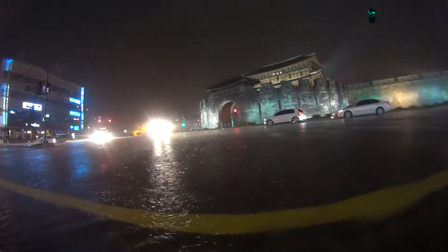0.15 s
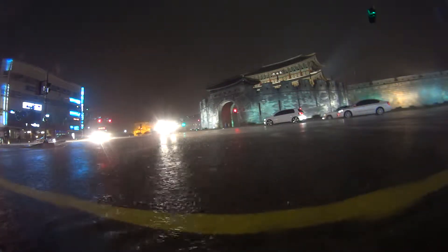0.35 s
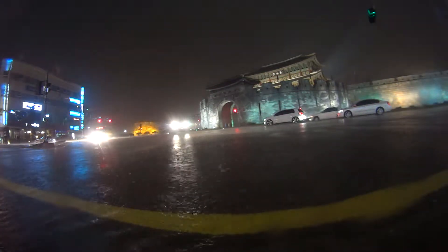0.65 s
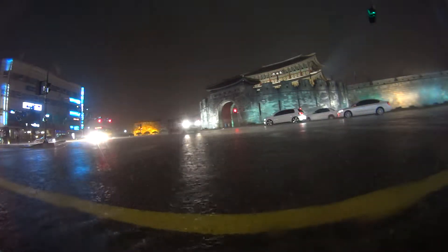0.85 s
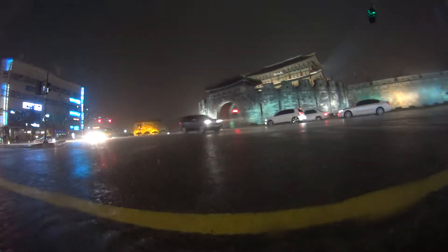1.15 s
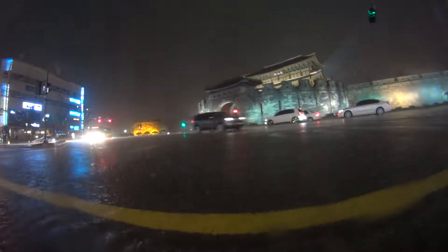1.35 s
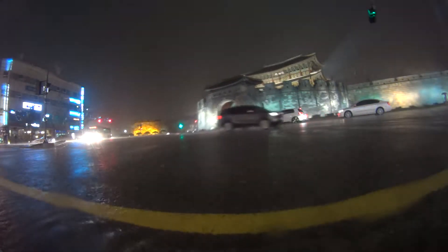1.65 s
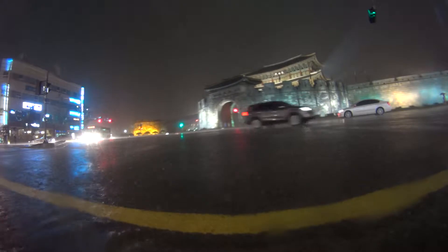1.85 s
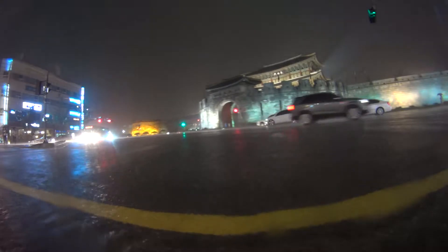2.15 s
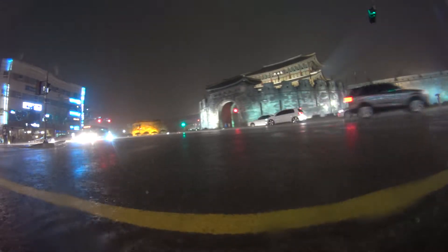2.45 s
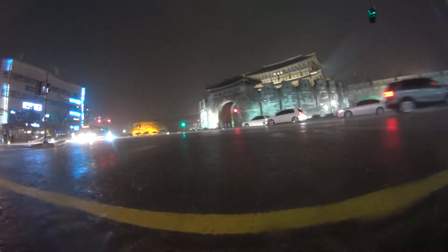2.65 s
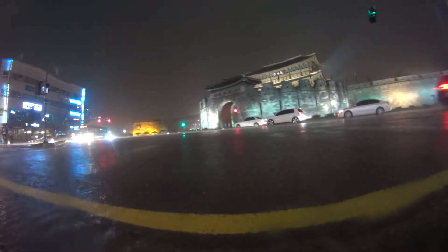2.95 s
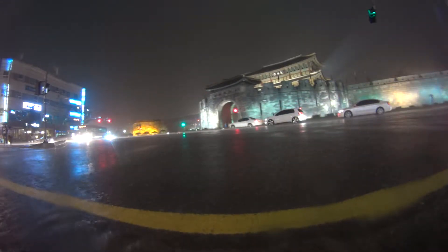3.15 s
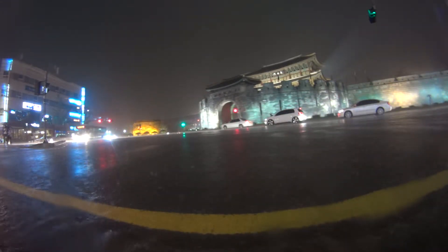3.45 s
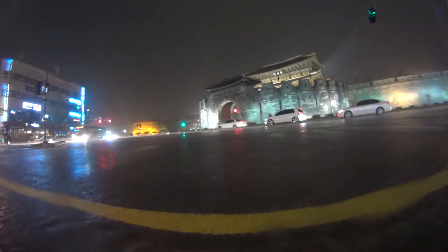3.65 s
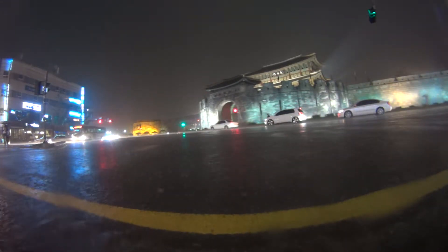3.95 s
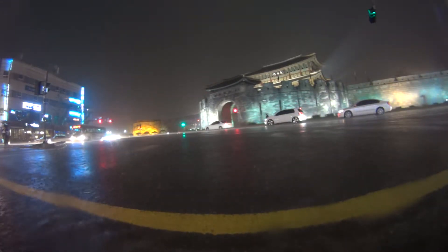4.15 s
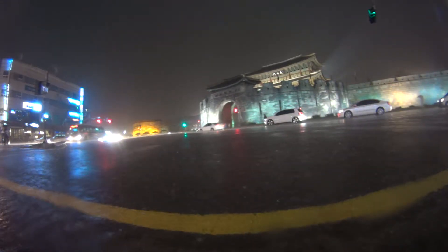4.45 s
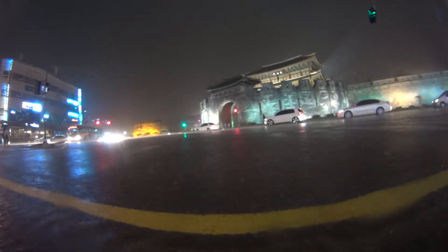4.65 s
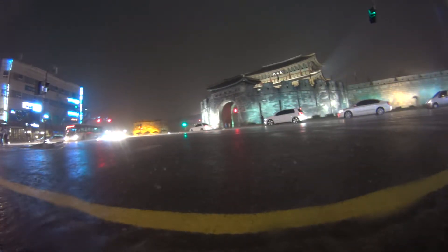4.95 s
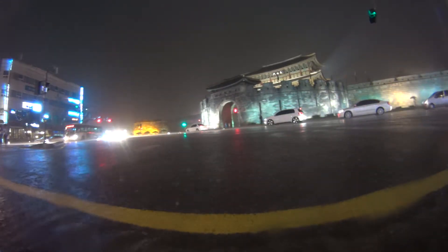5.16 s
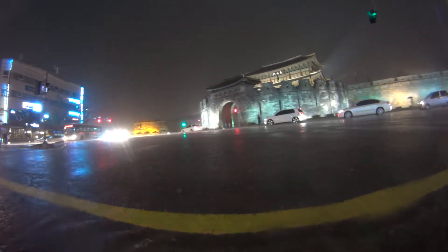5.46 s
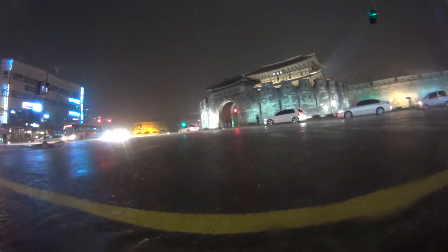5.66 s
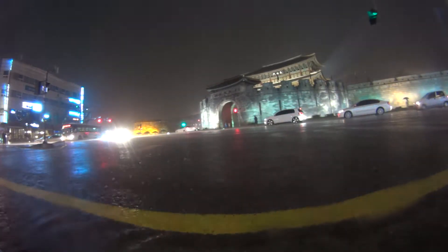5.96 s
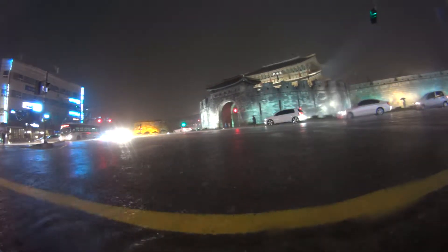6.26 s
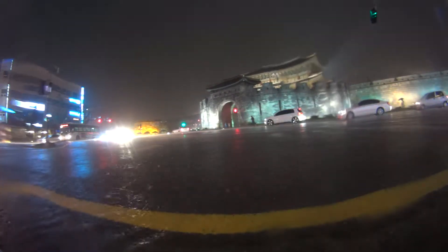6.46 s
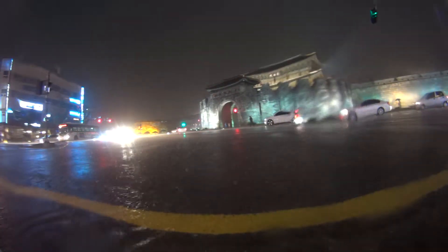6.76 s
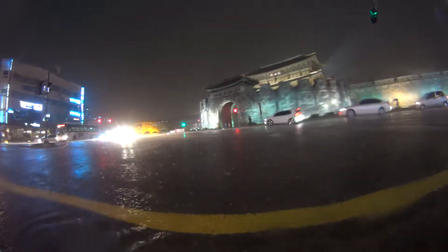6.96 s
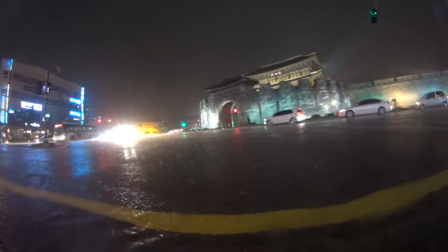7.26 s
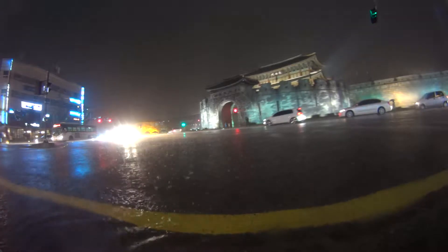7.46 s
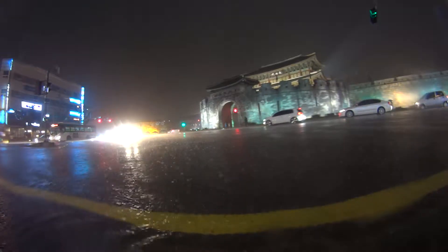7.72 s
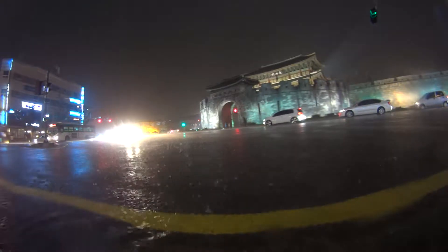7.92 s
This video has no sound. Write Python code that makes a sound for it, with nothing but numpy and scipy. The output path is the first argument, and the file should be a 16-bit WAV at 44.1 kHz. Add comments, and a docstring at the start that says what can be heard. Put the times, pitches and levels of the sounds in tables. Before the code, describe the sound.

Heavy rain drums hard on a small plastic camera housing at ground level, ringing and cracking, while a car swishes past on the wet road.

```python
"""Heavy night rain on a wet road, heard from a small waterproof camera standing on the ground.
From the start rain patters on the asphalt all round and drops crack, ring and thud on the housing;
a few land softly and gulp. A car swishes past through the water, closest just before two seconds.
From the middle a few drops trap a bubble and ping; distant traffic swells again at the end.
Shaped noise makes road and tyres, struck modes make the drops; a limiter ducks after the loudest."""
import sys
import numpy as np
from scipy import signal
from scipy.fft import rfft, irfft, next_fast_len
from scipy.io import wavfile
from scipy.ndimage import uniform_filter1d

SR = 44100
rng = np.random.default_rng(int(sys.argv[2]) if len(sys.argv) > 2 else 0)


def file_out(sig):
    """Save sig as 16-bit WAV at sys.argv[1]."""
    # one column per channel
    cols = np.atleast_2d(sig).T
    # limit, then scale
    lim = np.clip(cols, -1, 1)
    pcm = np.round(lim * 32767).astype(np.int16)
    wavfile.write(sys.argv[1], SR, pcm)


N = 356769  # length in samples


def from_db(db):
    """Decibels to gain."""
    return 10 ** (np.asarray(db) / 20)


def rms_one(x):
    """Scale to rms 1."""
    return x / np.sqrt(np.mean(x ** 2) + 1e-20)


def in_time(rows):
    """One curve per column after the time in seconds, a value at every sample."""
    s, *columns = np.transpose(rows)
    return [np.interp(np.arange(N) / SR, s, c) for c in columns]


def colour(x, points, share=1):
    """Causal (minimum-phase) filter with the given spectrum, or a share of its decibels."""
    size = next_fast_len(N + 8192)
    size += size % 2
    hz, db = np.transpose(points)
    bins_hz = np.arange(size // 2 + 1) * SR / size
    curve_db = share * np.interp(np.log(bins_hz + 1), np.log(hz), db)
    # folding the cepstrum onto positive times makes the filter causal
    cepstrum = irfft(np.log(from_db(curve_db)))
    cepstrum[1:size // 2] *= 2
    cepstrum[size // 2 + 1:] = 0
    response = np.exp(rfft(cepstrum))
    return irfft(rfft(x, size) * response)[..., :N]


def filtered(x, order, hz, kind="low"):
    """Butterworth filter along time."""
    return signal.sosfilt(signal.butter(order, hz, kind, fs=SR, output="sos"), x)


def wander(size):
    """Slow chance, smooth over size samples; spread 1."""
    return rms_one(uniform_filter1d(rng.standard_normal(N), size=size, mode="wrap"))


# How outside sound reaches the two microphone ports in step. Each row: frequency in Hz, gain in dB.
IN_STEP_SPECTRUM = [(30, -14.5), (60, -5), (230, -9), (310, -4.5), (450, -8), (1170, -2), (1540, 13),
                    (2000, -0.5), (2650, -6.5), (3250, 1.5), (3600, -11), (5000, -7.5), (6400, -16.5),
                    (7400, -21), (8200, -18.5), (10300, -39.5)]
# The same for sound that reaches the ports opposed. Each row: frequency in Hz, gain in dB.
OPPOSED_SPECTRUM = [(170, -22), (310, -4), (420, -11), (1250, -6), (1540, 1), (2150, -12.5), (2900, 5),
                    (3650, -9), (4300, -4.5), (5100, -17), (7200, -17.5), (10300, -37)]
# Colour that sets the ports apart, applied in part to each. Each row: frequency in Hz, full tilt in dB.
PORT_TILT = [(500, 0.5), (980, -2.5), (1450, 3), (2300, 11.5), (3100, 0.5), (4200, -1), (5500, 1.5)]


def through_ports(pair):
    """Two unrelated signals become a diffuse sound heard through the housing; rms 1."""
    mid = colour(pair[0], IN_STEP_SPECTRUM)
    side = colour(pair[1], OPPOSED_SPECTRUM)
    left = colour(mid + side, PORT_TILT, 0.42)
    right = colour(mid - side, PORT_TILT, -0.11)
    return rms_one(np.array([left, right]))


# Rain on the asphalt as it reaches the ports. Each row: time in seconds, rms level in dB.
RAIN_LEVEL = [(0, -29.5), (3.2, -31), (5.1, -33), (6.8, -31.5), (8.09, -31)]


def road_rain(ticks_per_s=700, spread_db=14.0, wash_db=2, tick_top_hz=3500):
    """Near drops tick on the asphalt, softened by its water film; the countless far ones merge into a wash."""
    sizes = from_db(spread_db * np.minimum(rng.exponential(1, N), 2))
    landings = rng.random(N) < ticks_per_s / SR
    bearing = rng.uniform(0, 2 * np.pi, N)
    ticks = np.array([np.cos(bearing), np.sin(bearing)]) * sizes * landings
    ticks = filtered(ticks + 1e-18, 1, tick_top_hz)
    wash = from_db(wash_db) * rng.standard_normal((2, N))
    patter = .5 * rms_one(ticks) + wash
    return from_db(in_time(RAIN_LEVEL)[0]) * through_ports(patter)


# When the car is closest, the time it takes to cover that distance,
# and the delay before its exhaust faces the camera, all in seconds
CLOSEST_S, PASS_S, EXHAUST_LAG_S = 1.85, 1.18, 0.35
# gains when closest, the swish before the standing water is added
SWISH_DB, SPRAY_DB, ENGINE_DB = -29, -36, -52
# fall of level with distance, as powers of it: spray and engine are heard mostly side-on
SWISH_FALL, SPRAY_FALL, ENGINE_FALL = 1.0, 3.2, 7.9
FAR_RUMBLE_DB = -64.5  # gain of the steady rumble of distant engines
# Standing water under the tyres. Each row: time in seconds, swish it adds in dB.
STANDING_WATER = [(0, 1), (.8, 0.2), (1.35, 3), (1.9, -0.5), (2.45, 0.9), (2.75, 2.5), (3.5, 3.5),
                  (4.2, -10)]
# Distant traffic, drawing nearer at the end. Each row: time in seconds, swish gain in dB, spray gain in dB.
FAR_TRAFFIC = [(0, -60, -44), (4.5, -75, -51.5), (8.09, -40, -48.5)]


def passing():
    """Gains of swish, spray and engine as the car drives by in a straight line, over distant traffic."""
    t = np.arange(N) / SR - CLOSEST_S
    distance = np.hypot(1, t / PASS_S)  # 1 when closest
    exhaust_distance = np.hypot(1, (t - EXHAUST_LAG_S) / PASS_S)
    far_swish_db, far_spray_db = in_time(FAR_TRAFFIC)
    near_swish = from_db(SWISH_DB + in_time(STANDING_WATER)[0]) / distance ** SWISH_FALL
    near_spray = from_db(SPRAY_DB) / distance ** SPRAY_FALL
    near_engine = from_db(ENGINE_DB) / exhaust_distance ** ENGINE_FALL
    # near and far add as powers
    swish = np.hypot(near_swish, from_db(far_swish_db))
    spray = np.hypot(near_spray, from_db(far_spray_db))
    engine = np.hypot(near_engine, from_db(FAR_RUMBLE_DB))
    return swish, spray, engine


# Colour of the tyres' swish before the ports. Each row: frequency in Hz, gain in dB.
SWISH_COLOUR = [(200, -10.5), (1500, 0.5), (2700, 4), (5500, 6), (10000, -0.5)]
# Colour of the fine spray before the ports. Each row: frequency in Hz, gain in dB.
SPRAY_COLOUR = [(1500, -16), (4400, -21), (5000, 18), (5600, -18), (6700, -2), (7400, 20), (8200, 4),
                (9800, 24)]
# Colour of the engine's rumble. Each row: frequency in Hz, gain in dB.
RUMBLE_COLOUR = [(30, -2), (60, -38), (100, -4), (200, 4)]


def car(hum_hz=59, hum_db=-1):
    """Tyres squeeze out water, fine spray hisses while the car is side-on, the engine hums and rumbles below."""
    swish_gain, spray_gain, engine_gain = passing()
    swish = swish_gain * through_ports(colour(rng.standard_normal((2, N)), SWISH_COLOUR))
    spray = spray_gain * through_ports(colour(rng.standard_normal((2, N)), SPRAY_COLOUR))
    wandering_hz = hum_hz + 2.64 * wander(size=8000)
    hum = from_db(hum_db) * np.sin(2 * np.pi * np.cumsum(wandering_hz) / SR)
    rumble = 2.5 * rms_one(colour(rng.standard_normal(N), RUMBLE_COLOUR))
    # the water under the tyres is of uneven depth
    puddles = from_db(.8 * wander(size=5000))
    return puddles * (swish + spray) + engine_gain * (hum + rumble)


DROP_SAMPLES = 2800  # length of one drop's sound


def ringing(hz, t60):
    """One dying sine per row; t60 in seconds."""
    t = np.arange(DROP_SAMPLES) / SR
    decay = from_db(-60 * np.minimum(t / t60[..., None], 2))
    return np.sin(2 * np.pi * hz[..., None] * t) * decay


def struck(modes, count, apart, detune=0.02, uneven_db=4.5):
    """Each drop lands elsewhere: it loads every mode a little and wakes it with its own strength at each port."""
    hz, db, t60 = np.transpose(modes)
    draw = rng.standard_normal((count, 5, len(hz)))
    opposed = np.array([[1], [-1]])
    sign = np.sign(draw[:, :1] + apart * draw[:, 1:2] * opposed)
    strength = sign * from_db(db + uneven_db * draw[:, 3:])
    return strength @ ringing(hz * (1 + detune * draw[:, 2]), t60)


def impact(count, splash, splash_s, size=300):
    """Force of each drop: a sharp blow, then a ragged push as it bursts."""
    fade = np.exp(-np.arange(size) / SR / splash_s)
    force = splash * rng.standard_normal((count, 1, size)) * fade
    force[..., 0] += 1
    return force


def sounded(response, force, db):
    """Drive a response with a force; its energy, as if spread over 10 ms, gives the rms level."""
    wave = signal.fftconvolve(response, force, axes=-1)[..., :DROP_SAMPLES]
    power = np.mean(np.sum(wave ** 2, axis=-1), axis=-1) / (.01 * SR)
    return wave * (from_db(db) / np.sqrt(power + 1e-20))[:, None, None]


def laid_out(times, waves):
    """Add each drop's sound at its moment."""
    out = np.zeros((2, N + DROP_SAMPLES))
    starts = np.clip(times * SR, 0, N - 1).astype(int)
    for at, wave in zip(starts, waves):
        out[:, at:at + DROP_SAMPLES] += wave
    return out[:, :N]


# the air pocket before the microphones: its own note, and the cycles until a ring has fallen by 60 dB
POCKET_HZ, RING_CYCLES = 1550, 24
# the water of a drop that thuds at the given level damps the shell at this rate; heavier drops damp it more
DAMPING_DB_PER_S, DAMPING_THUD_DB = 350, -24.5
# Low modes of the shell. Each row: frequency in Hz, relative strength in dB,
# fall time by 60 dB in seconds before the water's damping.
SHELL_MODES = [(309.5, -16, 0.26), (430, -6.5, 0.0082), (583, -11, 0.02), (683, -12, 0.11),
               (750, -4, 0.0043), (974, 3.5, 0.0051)]
# Hard, short modes of the front plate. Each row: frequency in Hz, relative strength in dB,
# fall time by 60 dB in seconds.
PLATE_MODES = [(2480, 15.5, 0.00088), (3210, 0, 0.013), (3750, 3.5, 0.0018), (4860, -9, 0.012),
               (5820, -6.5, 0.0043), (7250, -19, 0.012), (9190, -8, 0.0032)]


def housing_drops(rows, top_hz=6000, pocket_share=0.11, ring_pan_db=3.16, burst_s=.0011):
    """Ring, thud and crack of drops given as (s, ring Hz, ring dB, thud dB, crack dB); a soft drop has a low top."""
    s, hz, rings, thuds, cracks = np.transpose(rows)
    count = len(s)

    # the water film retunes and damps the air pocket from drop to drop; its own note lingers
    t60 = RING_CYCLES / np.sqrt(hz * POCKET_HZ) * from_db(1.4 * rng.standard_normal(count))
    own_note = ringing(np.full(count, POCKET_HZ), np.full(count, RING_CYCLES / POCKET_HZ))
    pocket = ringing(hz, t60) + pocket_share * own_note
    pocket = filtered(pocket, 2, [1050, top_hz], "band")
    pocket = pocket[:, None] * from_db([[ring_pan_db], [-ring_pan_db]])
    ring = sounded(pocket, impact(count, splash=.13, splash_s=burst_s), rings)

    # the spreading water keeps shaking the shell, so the thud has a rough tail
    shell = filtered(struck(SHELL_MODES, count, apart=0.87), 2, [235, 1400], "band")
    damping = DAMPING_DB_PER_S * from_db(thuds - DAMPING_THUD_DB)[:, None, None]
    shell = shell * from_db(-damping * np.arange(DROP_SAMPLES) / SR)
    thud = sounded(shell, impact(count, splash=.06, splash_s=.0065, size=1400), thuds)

    # the stiff plate answers with one crisp, broad tap
    plate = filtered(struck(PLATE_MODES, count, apart=.9, uneven_db=1.5), 2, 1900, "high")
    crack = sounded(plate, impact(count, splash=.24, splash_s=.0013), cracks)
    return laid_out(s, ring + thud + crack)


def droplets(count=100, centre_hz=1720, level_db=-37, spread_db=3, thud_below_db=9, crack_below_db=16):
    """Small drops and splash thrown up from the road land softly on the housing at random."""
    draw = rng.standard_normal((count, 4))
    s = rng.uniform(0, N / SR, count)
    db = level_db + spread_db * np.minimum(draw[:, 0], 2)
    hz = centre_hz * from_db(draw[:, 1])
    thud = db - thud_below_db + 4 * draw[:, 2]
    crack = db - crack_below_db + 3 * draw[:, 3]
    return housing_drops(np.transpose([s, hz, db, thud, crack]), top_hz=2400)


# a gulp slides down between these notes and dies away
GULP_START_HZ, GULP_END_HZ, GULP_SLIDE_S, GULP_T60_S = 1065, 490, 0.00327, 0.023
# scatter of the gulp's pitch (share), and how far the shell's thud lies below a gulp
GULP_SCATTER, THUD_BELOW_GULP_DB = 0.1, 2.5


def gulping(times, db):
    """The water closes over a drop with a rough note that slides down."""
    t = np.arange(DROP_SAMPLES) / SR
    tune = np.exp(GULP_SCATTER * rng.standard_normal((len(times), 1)))
    slide = np.exp(-t / GULP_SLIDE_S)
    hz = tune * (GULP_END_HZ + (GULP_START_HZ - GULP_END_HZ) * slide)
    swell_and_fade = (1 - slide) * from_db(-60 * t / GULP_T60_S)
    note = np.sin(2 * np.pi * np.cumsum(hz, axis=1) / SR) * swell_and_fade
    force = impact(len(times), splash=.25, splash_s=.005, size=900)
    return laid_out(times, sounded(note[:, None], force, db))


# Drops that trap a tiny bubble on the housing. Each row: start in seconds, bubble note in Hz,
# ring level in dB, gulp level in dB, crack level in dB (levels as rms over 10 ms).
BUBBLE_DROPS = [(4.538, 4970, -22.5, -15.5, -32), (5.0878, 4620, -18, -23.5, -24),
                (5.3227, 1900, -15.5, -26.5, -24.5), (5.451, 1910, -17, -35, -25),
                (6.3792, 2640, -21.5, -32, -17), (6.8117, 2600, -22, -44, -29),
                (7.1446, 4940, -20, -46, -38), (7.4808, 4640, -21.5, -32.5, -38),
                (7.7679, 4740, -21.5, -26.5, -30)]


def pings():
    """The bubble's high note takes the place of the pocket's, and the water gulps with it."""
    s, hz, rings, gulps, cracks = np.transpose(BUBBLE_DROPS)
    rows = np.transpose([s, hz, rings, gulps - THUD_BELOW_GULP_DB, cracks])
    return housing_drops(rows) + gulping(s, gulps)


# the air pocket's note under a hard drop and under a cushioned one, and its scatter from drop to drop (share)
HARD_HZ, PLOP_HZ, DETUNE = 1579, 1726, 0.026
# Drops cushioned by the water on the housing. Each row: start in seconds, ring level in dB,
# gulp level in dB (levels as rms over 10 ms).
CUSHIONED_DROPS = [(0.1745, -11.5, -31), (1.0778, -13.5, -24), (1.1285, -16, -26.5), (1.1699, -26, -31),
                   (1.6204, -12.5, -36), (1.878, -15, -24.5), (2.3318, -13, -40), (2.6266, -14, -27),
                   (2.884, -28, -29.5), (2.976, -41, -29), (3.6666, -16.5, -22.5), (3.8329, -20.5, -28.5),
                   (5.1637, -14, -28), (5.2301, -13.5, -32), (5.3639, -18, -23.5), (5.526, -25, -29.5),
                   (6.1531, -29, -30), (6.32, -17, -35), (6.6664, -11.5, -39), (7.1748, -12.5, -28.5),
                   (7.5241, -16, -37.5)]


def plops(crack_below_db=30):
    """A cushioned drop hardly cracks: it rings higher and duller, and gulps."""
    s, rings, gulps = np.transpose(CUSHIONED_DROPS)
    hz = PLOP_HZ * np.exp(DETUNE * rng.standard_normal(len(s)))
    rows = np.transpose([s, hz, rings, gulps - THUD_BELOW_GULP_DB, rings - crack_below_db])
    return housing_drops(rows, top_hz=2410, burst_s=0.0027) + gulping(s, gulps)


# Hard drops, medium to heavy, that ring, thud and crack on the housing. Each row: start in seconds,
# ring level in dB, thud level in dB, crack level in dB (levels as rms over 10 ms).
HARD_DROPS = [(0.1366, -12, -28, -18.5), (0.1532, -17.5, -17, -19), (0.2035, -17.5, -28.5, -25),
              (0.305, -13, -26, -23.5), (0.4244, -21.5, -30, -26), (0.4532, -13, -29, -23),
              (0.5185, -16, -37, -23.5), (0.5441, -14, -30.5, -33), (0.6314, -12.5, -25.5, -17.5),
              (0.7994, -11.5, -22.5, -20.5), (0.8601, -15.5, -27, -20), (0.9689, -15.5, -25, -19),
              (0.9922, -14, -23, -26), (1.0326, -23, -55, -27), (1.4522, -16, -22.5, -19),
              (1.496, -24, -34, -28), (1.502, -11.5, -29, -18), (1.538, -15.5, -29, -19.5),
              (1.5466, -17, -28, -25), (1.6026, -21, -28, -22.5), (1.6601, -19.5, -36, -33),
              (1.7009, -13, -32.5, -21.5), (1.777, -18, -27.5, -27.5), (2.0303, -17, -40, -25),
              (2.0651, -15.5, -32, -13.5), (2.2377, -24.5, -34, -21.5), (2.275, -12.5, -30.5, -21),
              (2.4651, -22.5, -42, -25.5), (2.517, -13, -34, -23.5), (2.7868, -16.5, -23, -23.5),
              (2.8364, -20, -30, -28), (3.053, -15, -22.5, -26), (3.1925, -25, -46, -33),
              (3.2221, -13.5, -31, -29), (3.32, -12.5, -33, -10.5), (3.3463, -13.5, -46, -19.5),
              (3.5548, -20, -34, -21.5), (3.5828, -12.5, -19.5, -21), (3.5968, -15.5, -34, -17.5),
              (3.6408, -16, -34, -15), (3.7924, -13, -31, -20), (3.892, -22, -24.5, -25),
              (3.9041, -13.5, -27, -21), (4.074, -21, -25.5, -26), (4.1948, -14, -32, -22.5),
              (4.4733, -21.5, -28.5, -31.5), (4.5375, -24, -18.5, -24.5), (4.6514, -21, -52, -27),
              (4.6752, -27.5, -34.5, -22), (4.7247, -14, -22.5, -27), (4.7581, -19, -35, -21.5),
              (4.8, -19.5, -31, -21), (4.8072, -15.5, -46, -21.5), (4.8164, -14.5, -20, -24),
              (4.9231, -27, -34, -23), (4.9428, -19, -25.5, -24), (5.0062, -17.5, -28.5, -23.5),
              (5.0258, -22, -28, -25), (5.4579, -13.5, -31, -18), (5.609, -14.5, -32.5, -21.5),
              (5.6459, -13.5, -26.5, -22), (5.7291, -18.5, -35, -24.5), (5.8324, -20.5, -47, -29),
              (6.005, -17, -43, -31), (6.0329, -14, -34, -24), (6.0622, -18, -20, -15.5),
              (6.1737, -13, -32, -17.5), (6.2921, -21, -36, -26), (6.3553, -16, -19.5, -24),
              (6.516, -12.5, -25.5, -20), (6.5595, -13, -29, -16.5), (6.7274, -12, -36, -20),
              (6.8453, -20, -25.5, -11.5), (6.9511, -21.5, -30, -31.5), (6.9835, -21, -23, -25),
              (6.9934, -20, -46, -32), (7.0424, -13, -33, -18.5), (7.1274, -22.5, -35, -27.5),
              (7.1612, -24, -28, -26.5), (7.359, -13.5, -32, -20.5), (7.3754, -19.5, -47, -17.5),
              (7.388, -16, -32.5, -22), (7.5798, -18.5, -29.5, -25.5), (7.737, -21, -27, -29),
              (7.8251, -20, -28, -22.5), (7.8398, -19.5, -33, -32), (7.8727, -25, -29, -28),
              (7.884, -14.5, -36, -23), (7.9022, -13.5, -27, -20), (8.0334, -14, -28, -16.5)]


def hard_hits():
    """Hard drops all ring the same air pocket, each a little out of tune."""
    s, rings, thuds, cracks = np.transpose(HARD_DROPS)
    hz = HARD_HZ * np.exp(DETUNE * rng.standard_normal(len(s)))
    return housing_drops(np.transpose([s, hz, rings, thuds, cracks]))


def scene():
    """The wet street behind, fine splash and lighter drops on the housing, the hard drops in front."""
    street = road_rain() + car()
    light_drops = droplets(count=32, level_db=-30, crack_below_db=8)
    return street + droplets() + light_drops + pings() + plops() + hard_hits()


LIMIT_DB, RELEASE_DB_PER_S, LIMIT_ATTACK_S = -9.5, 50, 0.0025


def limiter(x):
    """Loud moments pull the gain down fast; it climbs back steadily, so the street dips after them."""
    size = int(LIMIT_ATTACK_S * SR) + 1
    power = uniform_filter1d(x ** 2, size=size, axis=1).max(axis=0)  # the louder port decides
    over_db = np.maximum(10 * np.log10(np.abs(power) + 1e-12) - LIMIT_DB, 0)
    climb = RELEASE_DB_PER_S * np.arange(N) / SR
    cut_db = np.maximum.accumulate(over_db + climb) - climb
    ahead = np.roll(cut_db, -size // 2)  # it looks a little ahead
    return x * from_db(-uniform_filter1d(ahead, size=size))


def record(dry, ceiling=.8, cutoff_hz=10950):
    """The limiter ducks, peaks are rounded, the treble is cut steeply."""
    rounded = ceiling * np.tanh(limiter(dry) / ceiling)
    treble_cut = signal.ellip(12, .3, 70, cutoff_hz, fs=SR, output="sos")
    return signal.sosfilt(treble_cut, rounded)


dry = scene()
out = record(dry)
file_out(out)
```